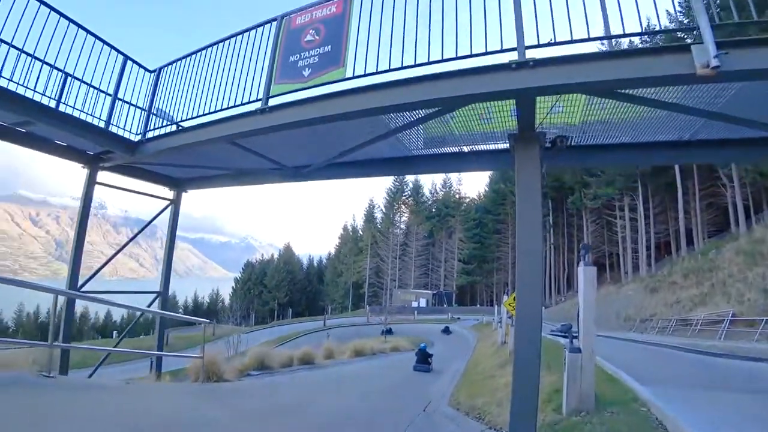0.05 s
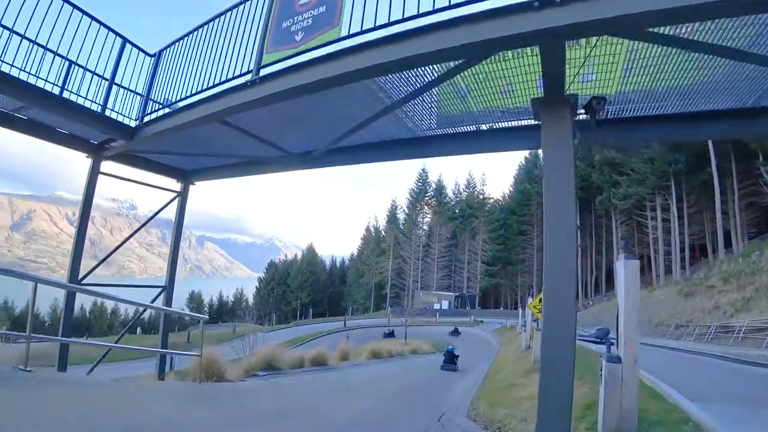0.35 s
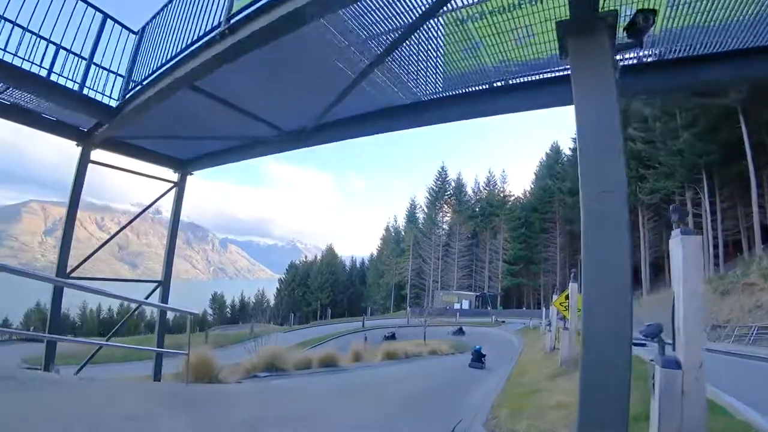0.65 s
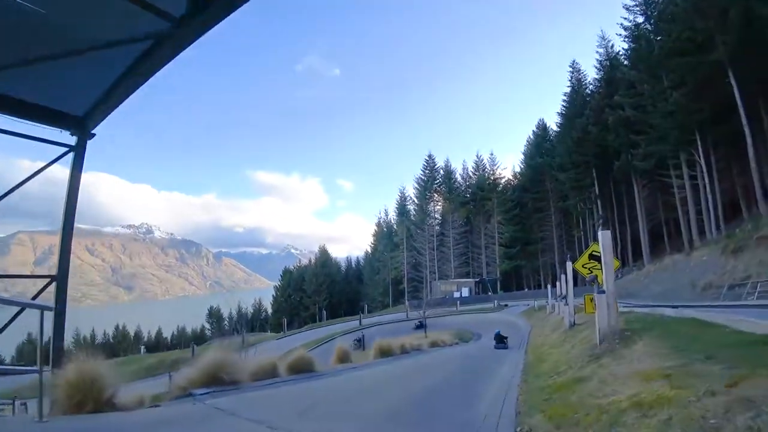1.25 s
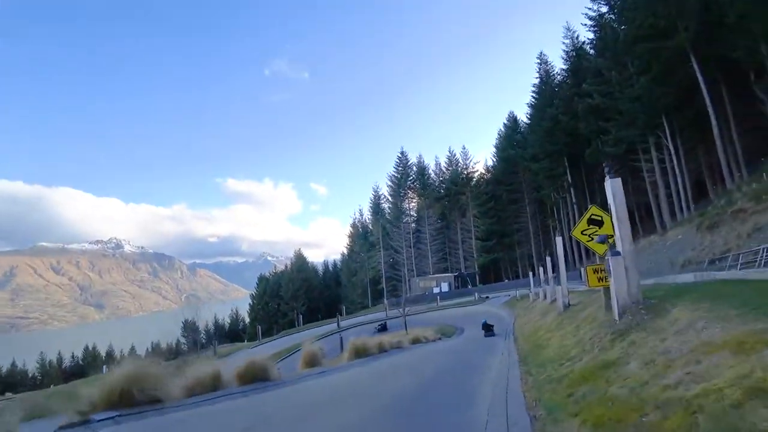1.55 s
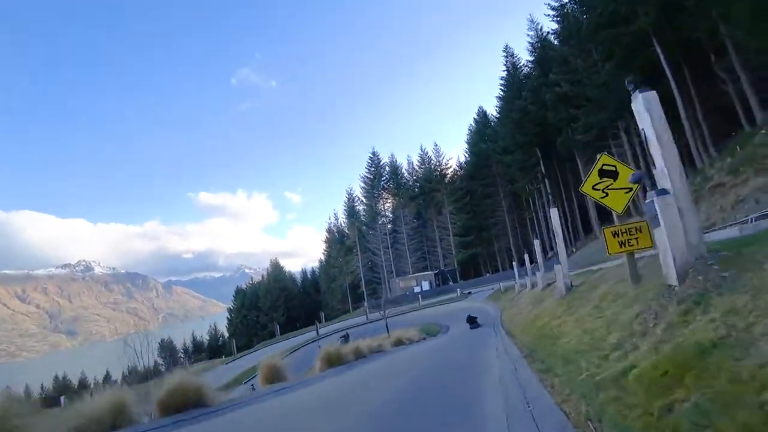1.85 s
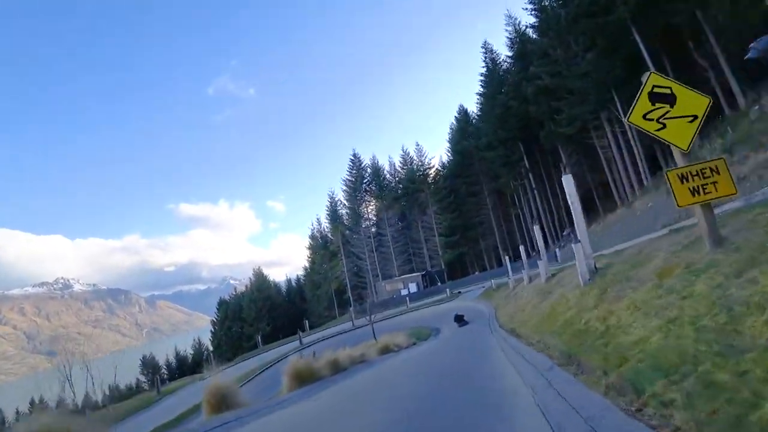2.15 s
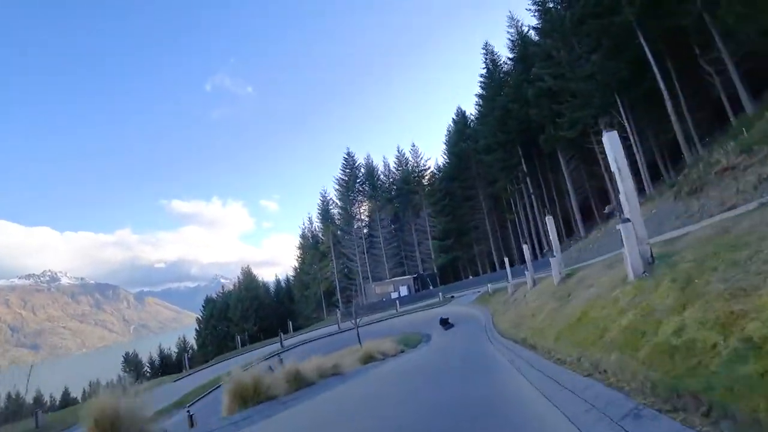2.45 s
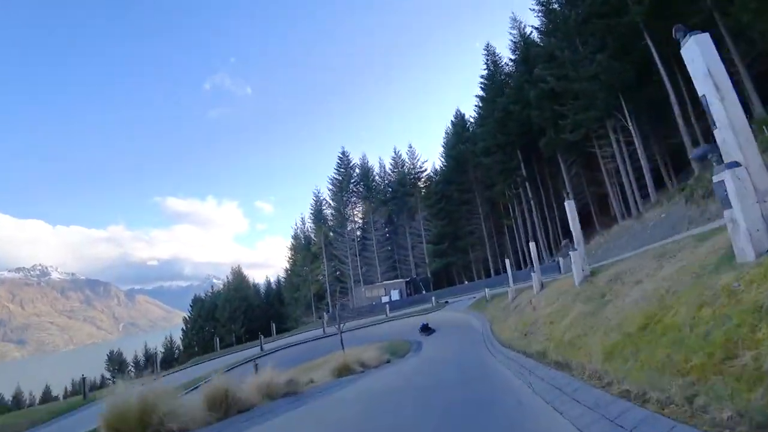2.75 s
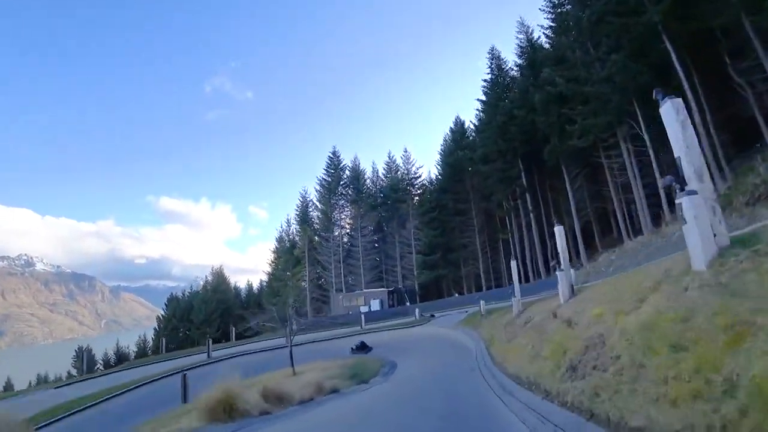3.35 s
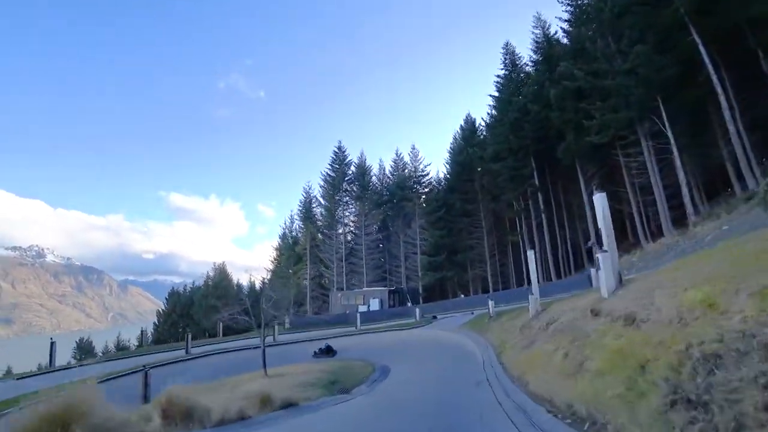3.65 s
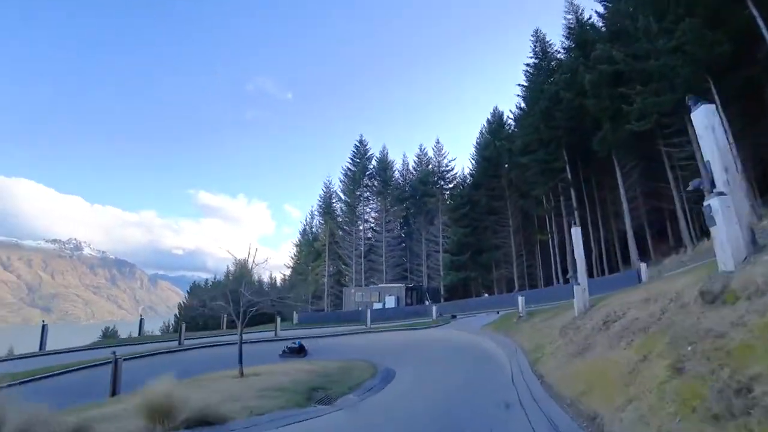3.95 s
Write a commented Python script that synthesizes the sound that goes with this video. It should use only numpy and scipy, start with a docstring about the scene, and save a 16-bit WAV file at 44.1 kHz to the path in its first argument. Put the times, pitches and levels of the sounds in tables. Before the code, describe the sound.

Rolling rumble of a small downhill cart speeding up, with bumps, rattles and light wind.

```python
"""Hard wheels drum and knock on rough paving as a gravity luge cart gathers speed, heard from its seat.
The road forces the hollow shell into vibration at its resonances. Grit cracks under the wheels and
loose fittings clack at bumps. Friction makes the brake hiss, scrape and squeak, fading to a thin
ring as the cart runs free, and the bearings sizzle faintly.
Air buffets the microphone, whose limiter holds the peaks."""
import sys
import numpy as np
from scipy import signal
from scipy.fft import rfft, irfft
from scipy.io import wavfile
from scipy.ndimage import uniform_filter1d, minimum_filter1d, map_coordinates

SR = 44100
rng = np.random.default_rng(int(sys.argv[2]) if len(sys.argv) > 2 else 0)


def transcribe(signal):
    """Save signal, clipped to [-1, 1], as a 16-bit WAV file at the path in sys.argv[1]."""
    frames = np.atleast_2d(signal).T
    limited = np.clip(frames, -1, 1)
    pcm = np.round(limited * 32767).astype(np.int16)
    wavfile.write(sys.argv[1], SR, pcm)


N = 176400
TIME = np.arange(N) / SR

# knocks of the wheels on the paving (time [s], level [dB])
KNOCKS = [(.132, -22.5), (.191, -24), (.347, -24.5), (.395, -24.5), (.481, -26), (.522, -21.5), (.574, -21),
          (.666, -25), (.742, -19.5), (.816, -21.5), (.885, -23), (.937, -23.5), (1.003, -15.5),
          (1.059, -19.5), (1.106, -22), (1.154, -16.5), (1.214, -13.5), (1.254, -17), (1.310, -16),
          (1.440, -19), (1.462, -14.5), (1.70, -19), (2.047, -10), (2.384, -9), (2.995, -20), (3.563, -10)]
# drive of the grit and of the fittings' chatter (time [s], level [dB])
GRIT_LEVEL = [(0, -38.5), (1.15, -38), (1.42, -34), (1.48, -30), (1.8, -33.5), (2.03, -23.5), (2.25, -33),
              (2.55, -28), (3.3, -28.5), (3.62, -27.5), (3.78, -29), (4, -27)]
# metal modes of the pressed brake (frequency [Hz], level [dB])
PRESSED_MODES = [(2210, -0.5), (2480, 3.5), (3480, -2), (4240, 1.5), (5250, 0.5), (5460, 0), (6250, -2.5),
                 (7320, -5), (7770, 2), (8080, -3.5), (12250, -19)]
# modes of the barely touching brake (frequency [Hz], level [dB])
LIGHT_MODES = [(7580, 1.5), (8020, 1)]
GRAINS_PER_S, GRAIN_SPREAD_DB = 3200, 4.5
IMPACT_DETUNE, BRAKE_DETUNE = 0.043, 0.006  # relative spread of mode frequencies


def rumble():
    """Forced vibration: rough paving drives shell and wheel modes, whose balance shifts with speed."""
    # rolling drive (time [s], level [dB])
    roll_level = [(0, -28.5), (.3, -28), (.5, -25), (.68, -22.5), (.83, -23), (1.12, -20.5), (1.25, -16.5),
                  (1.39, -16.5), (1.43, -21.5), (1.475, -16), (1.7, -14), (2.25, -14), (2.385, -12),
                  (2.42, -18), (2.54, -14), (3.48, -15), (3.85, -14.5), (4, -14.5)]
    # shell modes (frequency [Hz], bandwidth [Hz], level when slow [dB], level when fast [dB])
    shell_modes = [(162.3, 23.6, -7.5, -5.5), (223, 47, -3, -6), (292.7, 47, 3, -1.5), (402.7, 27, -7, 1),
                   (452.8, 29, 1, 1.5), (508.5, 31, -0.5, 2.5), (549, 46, -2.5, 1.5), (641, 40, 1.5, 0.5),
                   (944, 130, -27, -6.5), (1197, 190, -10.5, -22.5), (1642, 43, -35, -9),
                   (2080, 130, -25, -17)]
    # modes driven by the out-of-round wheels, same columns
    wheel_modes = [(740, 39, 3.5, 9), (831, 55, 3, 10)]
    # their drive relative to the rolling (time [s], level [dB])
    wheel_level = [(0, -12.5), (.5, -7), (1.0, -4.5), (1.4, -4), (1.55, -0.5), (2.05, -8.5), (2.2, -6.5),
                   (2.35, -17), (2.41, -3.5), (2.7, -5), (3.5, -4), (3.85, -2)]
    # spectral envelope of the rumble (frequency [Hz], level [dB])
    spectrum = [(25, -3.5), (100, -16), (145, 0), (365, -1), (400, 1.5), (850, -2.5), (1400, -4),
                (2400, -6.5), (4000, -15.5), (9000, -84.5)]
    # stereo balance (frequency [Hz], left minus right [dB])
    balance = [(150, 0), (450, 0.3), (750, -0.5), (1100, -2), (2500, -5.5)]
    rate = turn_rate()
    speed = (rate - rate.min()) / np.ptp(rate)  # 0 slowest, 1 fastest
    rolling = 0
    for modes, gain in ((shell_modes, undb(-1)), (wheel_modes, curve(wheel_level))):
        road = unit(noise()) * gain
        hz, width, slow_db, fast_db = np.array(modes).T
        slow = through(road, resonances(zip(hz, width, slow_db)) * colour(spectrum))
        fast = through(road, resonances(zip(hz, width, fast_db)) * colour(spectrum))
        rolling += (slow * (1 - speed) + fast * speed) * curve(roll_level)
    shell = place(rolling * hop(), pan_db=-0.3, diffuse_db=-22.5) + knocks() + thuds()
    lean = np.sqrt(colour(balance))
    return irfft(rfft(shell) * np.array([lean, 1 / lean]), N)


def knocks():
    """Impact excitation: each blow of a wheel on the paving rings the shell."""
    # struck shell modes (frequency [Hz], level [dB])
    modes = [(430, -8), (540, -6.5), (735, -3), (820, -1.5)]
    return struck(KNOCKS, modes, ring_s=0.0052, detune=IMPACT_DETUNE)


def hop(dip_db=-1.5, delay_s=0.032, width_s=0.015):
    """Contact loss: a wheel lifts after each knock, so the rolling gain dips briefly."""
    return undb(dip_db * sum(np.exp(-((TIME - s - delay_s) / width_s) ** 2) for s, _ in KNOCKS))


def thuds():
    """Damped free vibration: dips in the track excite two low modes."""
    # dips (time [s], level [dB])
    dips = [(.70, -47), (.80, -41), (1.837, -46), (3.457, -40), (3.762, -39)]
    # low modes (frequency [Hz], level [dB])
    modes = [(52, -2), (84, 0)]
    return struck(dips, modes, ring_s=0.0078, detune=IMPACT_DETUNE)


def turn_rate():
    """Rolling: the wheels' turns per second follow the cart's speed."""
    # wheel rotation (time [s], rate [turns/s])
    turns = [(0, 10), (.25, 10.7), (.5, 14.5), (1.001, 13.5), (2, 22.5), (4, 24.2)]
    return np.interp(TIME, *np.array(turns).T)


def throb(start_turns=0.05):
    """Periodic loading: the contact force swings once a turn."""
    return np.cos(2 * np.pi * (np.cumsum(turn_rate()) / SR + start_turns))


def grit():
    """Shot noise: dense tiny cracks of grit under the wheels merge into a crackle."""
    # crackle spectrum (frequency [Hz], level [dB])
    spectrum = [(300, -17.5), (1000, 11), (1600, 5.5), (2300, 1.5), (3000, -14.5), (4400, -13), (6200, -24),
                (7500, -28.5), (9000, -37.5), (16000, -43)]
    cracks = grains(GRAINS_PER_S, GRAIN_SPREAD_DB) * curve(GRIT_LEVEL)
    return place(through(cracks, colour(spectrum)), pan_db=-1, diffuse_db=-12)


def fittings(chatter_db=-9.5, chatter_decay_s=0.0043, ring_db=-10.5):
    """Impact noise: loose parts chatter throughout and clack at bumps, with a tick and a short ring."""
    # clacks (time [s], body level [dB], tick level [dB], decay time [s])
    clacks = [(1.23, -13.5, -47.5, 0.0037), (1.235, -17.5, -42.5, 0.002), (1.244, -24, -51, 0.0099),
              (1.258, -27.5, -53, 0.0093), (1.272, -29.5, -58, 0.044), (1.461, -24.5, -65, 0.0087),
              (1.597, -25.5, -59, 0.0051), (1.903, -19, -30.5, 0.0099), (1.919, -17.5, -53.5, 0.008),
              (1.9505, -15, -33, 0.0024), (2.005, -24, -60, .005), (2.025, -24, -67, 0.0023),
              (2.092, -21.5, -50, 0.0055), (2.175, -21.5, -55, 0.0026), (2.432, -20, -67, 0.0042),
              (2.5442, -21, -44, 0.0044), (3.028, -21.5, -46, 0.0028), (3.307, -44, -38.5, .003),
              (3.466, -23, -38, 0.0065), (3.621, -25, -49, 0.0073), (3.636, -25, -53, 0.0085)]
    # spectrum of the chatter and of a clack's body (frequency [Hz], level [dB])
    body_spectrum = [(60, -33.5), (200, -9), (900, 0), (2300, 9), (3200, 1), (4500, -3), (6300, -10.5),
                     (9000, -30), (13000, -30.5), (16000, -38.5)]
    # spectrum of the sharp tick (frequency [Hz], level [dB])
    tick_spectrum = [(2000, -42), (6000, 12), (9000, 1), (13500, 1.5), (16000, -12.5)]
    # metal modes of the fittings (frequency [Hz], level [dB])
    modes = [(1976, -5.5), (2260, 3), (2520, -3.5)]
    collisions = impacts(per_s=90, spread_db=3.5) ** 2 + 1e-18
    chatter_energy = signal.lfilter([1], [1, -np.exp(-2 / (chatter_decay_s * SR))], collisions)
    body_power = (unit(np.sqrt(chatter_energy)) * curve(GRIT_LEVEL) * undb(chatter_db)) ** 2
    tick_power = 0
    for s, body_db, tick_db, decay_s in clacks:
        fall = (TIME >= s) * np.exp(-np.clip(2 * (TIME - s) / decay_s, 0, 20))
        body_power += fall * undb(body_db) ** 2
        tick_power += fall * undb(tick_db) ** 2
    body = through(noise() * np.sqrt(body_power), colour(body_spectrum))
    tick = through(noise() * np.sqrt(tick_power), colour(tick_spectrum))
    hits = [(s, db + ring_db) for s, db, _, _ in clacks]
    ring = struck(hits, modes, ring_s=0.0023, detune=IMPACT_DETUNE)
    return place(body + tick, pan_db=-2.5, diffuse_db=-11) + ring


def brake_hiss(uneven_db=3):
    """Sliding friction: countless small contacts of the brake make an uneven broadband hiss."""
    # rubbing drive (time [s], level [dB])
    level = [(0, -41), (.1, -34.5), (.22, -41.5), (.42, -41.5), (.51, -37), (.6, -39.5), (1.1, -44),
             (1.42, -40.5), (1.5, -36.5), (1.85, -39), (4, -54.5)]
    # friction spectrum (frequency [Hz], level [dB])
    spectrum = [(100, -45.5), (600, 2), (1500, 5.5), (3000, 5), (4300, 4), (6800, -5.5), (8000, -9),
                (9000, -19), (12500, -21), (16000, -27)]
    rub = grains(per_s=5000, spread_db=1) * undb(uneven_db * walk(40.24))
    return through(rub * curve(level), colour(spectrum))


def brake_scrapes(bandwidth_hz=60):
    """Resonance: the brake catches in short gritty bursts that ring its metal modes."""
    # catches (centre time [s], duration [s], level [dB])
    catches = [(0.022, 0.021, -35.5), (0.094, 0.047, -39), (0.301, 0.029, -36.5), (0.36, 0.043, -36),
               (0.418, 0.017, -34.5), (0.507, 0.045, -39), (0.942, 0.034, -43), (1.50, 0.045, -41.5)]
    force = sum(undb(db) * np.exp(-(2 * (TIME - s) / length) ** 4) for s, length, db in catches)
    metal = resonances([(hz, bandwidth_hz, db) for hz, db in PRESSED_MODES])
    return through(grains(GRAINS_PER_S, GRAIN_SPREAD_DB) * force, metal)


def brake_squeaks(slips_per_s=73, ring_s=0.0035, spread_db=4.5, phase_step_rad=0.085):
    """Stick-slip: each slip of the brake rings one metal mode for a moment, slightly off pitch."""
    # squeaking (time [s], level [dB])
    level = [(0, -51), (.24, -48.5), (.33, -47), (.93, -43), (1.12, -53), (1.7, -62), (4, -82.5)]
    age = np.arange(N // 100) / SR
    envelope = age / ring_s * np.exp(-age / ring_s)
    out = np.zeros((2, N + len(age)))
    for hz, db in PRESSED_MODES:
        chance = rng.standard_normal((256, 5))
        starts = (np.arange(len(chance)) + chance[:, 0]) * SR / slips_per_s
        for start, (_, offset, size, phase, diffuse) in zip(starts.astype(int), chance):
            if 0 <= start < N:
                roughness = phase_step_rad * np.cumsum(rng.standard_normal(len(age)))
                cycles = hz * (1 + BRAKE_DETUNE * offset) * age + phase
                ring = envelope * np.sin(2 * np.pi * cycles + roughness) * undb(db + spread_db * size)
                out[:, start:start + len(age)] += np.outer([1, diffuse], ring)
    return unit(out[:, :N]) * curve(level)


def brake_chirps():
    """Damped free vibration: the brake's two thin tones sound in short chirps."""
    # chirps (time [s], level [dB])
    chirps = [(1.398, -46), (1.628, -45), (1.734, -39)]
    return struck(chirps, LIGHT_MODES, ring_s=0.0045, detune=BRAKE_DETUNE)


def brake_ring(flutter_hz=59.5, waver_hz=70, throb_db=5):
    """Intermittent contact: the barely touching brake rings on two tones that flutter independently."""
    # ringing (time [s], level [dB])
    level = [(0, -68), (1.2, -68), (1.7, -65), (2.32, -54.5), (2.85, -58.5), (3.03, -55), (3.15, -69)]
    tones = 0
    for hz, db in LIGHT_MODES:
        contact = np.abs(walk(flutter_hz)) ** .5
        phase = 2 * np.pi * np.cumsum(hz + waver_hz * walk(500)) / SR
        tones += undb(db) * contact * np.sin(phase)
    return unit(tones * undb(throb_db * throb())) * curve(level)


def wind(gust_db=3):
    """Turbulence: gusts press on the microphone as low-frequency noise."""
    # buffeting (time [s], level [dB])
    level = [(0, -68), (.5, -58.5), (.8, -54.5), (1.9, -54), (2.7, -60.5), (4, -51)]
    # pressure spectrum (frequency [Hz], level [dB])
    spectrum = [(15, -26.5), (40, 4), (70, 11), (110, 17), (250, -42), (1000, -66)]
    gusts = unit(noise() * undb(gust_db * walk(12)))
    return place(through(gusts * curve(level), colour(spectrum)), pan_db=1.5, diffuse_db=-5)


def bearings(throb_db=6):
    """Amplitude modulation: the bearings' thin sizzle swells once a turn."""
    # bearing resonances (frequency [Hz], bandwidth [Hz], level [dB])
    modes = [(13480, 200, -2), (13900, 200, -5.5)]
    # sizzling (time [s], level [dB])
    level = [(0, -97), (1.2, -73), (2, -75.5), (3.3, -65.5), (4, -72)]
    drive = unit(noise() * undb(throb_db * throb()))
    return through(drive * curve(level), resonances(modes))


def struck(hits, modes, ring_s, detune):
    """Modal synthesis: each hit rings all the modes, a little differently every time."""
    age = np.arange(N // 32) / SR
    envelope = age / ring_s * np.exp(1 - age / ring_s)
    hz, mode_db = np.array(modes, float).T
    out = np.zeros(N + len(age))
    for (s, db), (offset, phase) in zip(hits, rng.standard_normal((len(hits), 2, len(hz)))):
        cycles = np.outer(hz * (1 + detune * offset), age) + phase[:, None]
        ring = envelope * (undb(mode_db) @ np.sin(2 * np.pi * cycles))
        start = max(int(s * SR), 0)
        out[start:start + len(age)] += unit(ring) * np.sqrt(np.mean(envelope ** 2)) * undb(db)
    return out[:N]


def impacts(per_s, spread_db):
    """Poisson process: randomly timed impulses, mostly small and a few large."""
    return (rng.random(N) < per_s / SR) * undb(spread_db * np.minimum(rng.exponential(size=N), np.pi))


def grains(per_s, spread_db):
    """Shot noise: a direct and diffuse pair of random impulses at rms 1."""
    return unit(impacts(per_s, spread_db) * noise())


def noise():
    """Two uncorrelated white noises: direct and diffuse."""
    return rng.standard_normal((2, N))


def walk(rate):
    """Smooth random wander with spread near 1."""
    return map_coordinates(rng.standard_normal(1024), [TIME * rate], order=3, mode="wrap")


def undb(db):
    """Decibels to gain."""
    return 10 ** (np.asarray(db) / 20)


def unit(x):
    """Scale to rms 1."""
    return x / np.sqrt(np.mean(x ** 2))


def curve(rows):
    """Gain over time from (time [s], level [dB]) points."""
    return undb(np.interp(TIME, *np.array(rows, float).T))


def freqs():
    """Frequency of each spectral bin, at least 1 Hz."""
    return np.maximum(np.arange(N // 2 + 1) * SR / N, 1)


def colour(rows):
    """Gain over frequency from (frequency [Hz], level [dB]) points."""
    hz, db = np.array(rows, float).T
    return undb(np.interp(np.log(freqs()), np.log(hz), db))


def resonances(rows):
    """Gain of resonators (frequency [Hz], bandwidth [Hz], level [dB]) summed in power."""
    f = freqs()
    powers = (undb(db) ** 2 / (1 + ((f * f - hz * hz) / (f * width)) ** 2) for hz, width, db in rows)
    return np.sqrt(sum(powers))


def through(x, gain):
    """Minimum-phase filter shaped by the gains; white noise keeps its power."""
    cepstrum = irfft(np.log(unit(gain) + 1e-9), N)
    cepstrum[1:N // 2] *= 2
    cepstrum[N // 2 + 1:] = 0
    response = irfft(np.exp(rfft(cepstrum)), N)[:N // 16]
    return signal.fftconvolve(x, response[None], axes=1)[:, :N]


def place(pair, pan_db, diffuse_db):
    """Level panning of a direct and diffuse pair; pan_db is left minus right."""
    side = undb(diffuse_db) * pair[1]
    return np.array([(pair[0] + side) * undb(pan_db / 2), (pair[0] - side) * undb(-pan_db / 2)])


def scene():
    """Superposition: the cart and the air add up, with a stereo width that depends on frequency."""
    # gain of the side signal (frequency [Hz], level [dB])
    width = [(30, -6.5), (90, 2), (170, -3), (900, 3), (1800, 4.5), (4300, -0.5), (9000, 2.5),
             (14000, -4.5)]
    cart = rumble() + grit() + fittings()
    friction = brake_hiss() + bearings()
    tones = brake_ring() + brake_chirps()
    friction += brake_scrapes() + brake_squeaks()
    left, right = cart + place(friction, pan_db=0, diffuse_db=-9.5) + tones + wind()
    mid = (left + right) / 2
    side = irfft(rfft(left - right) / 2 * colour(width), N)
    return np.array([mid + side, mid - side])


def record(dry, threshold_db=-18.5, slope=0.14, rms_s=0.019, limit_db=-3, limit_s=0.018, top_hz=15800):
    """Compression evens the loud stretch, a look-ahead limiter holds the peaks, a low-pass follows."""
    rms = np.sqrt(uniform_filter1d(np.mean(dry ** 2, axis=0), int(rms_s * SR)) + 1e-12)
    even = dry * np.minimum(1, undb(threshold_db) / rms) ** slope
    window = int(limit_s * SR)
    allowed_gain = np.minimum(1, undb(limit_db) / (np.abs(even).max(axis=0) + 1e-9))
    gain = uniform_filter1d(minimum_filter1d(allowed_gain, window), window)
    return signal.sosfilt(signal.ellip(10, .2, 80, top_hz, fs=SR, output="sos"), even * gain)


dry = scene()
out = record(dry)
transcribe(out)
```